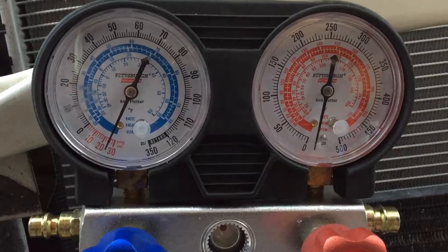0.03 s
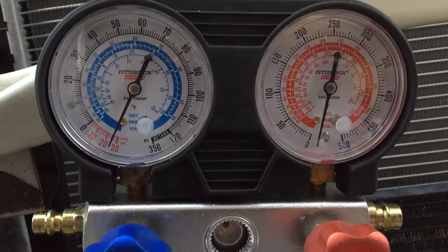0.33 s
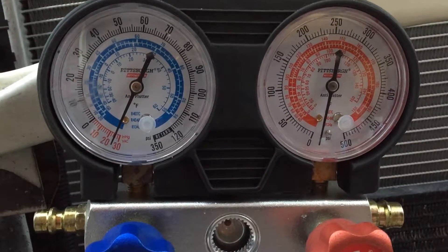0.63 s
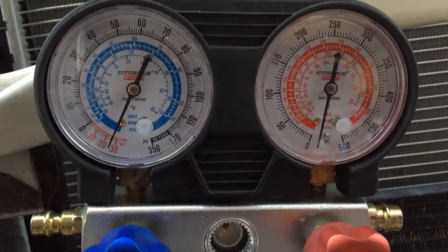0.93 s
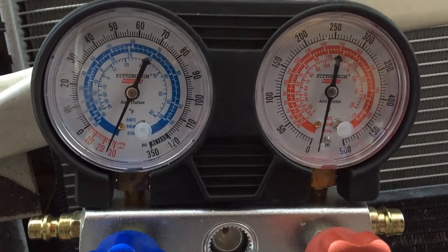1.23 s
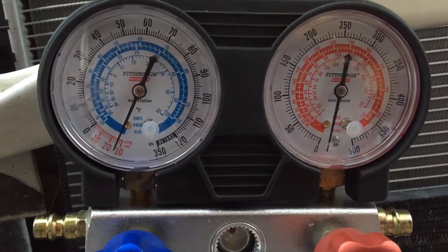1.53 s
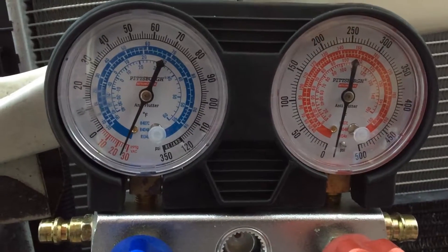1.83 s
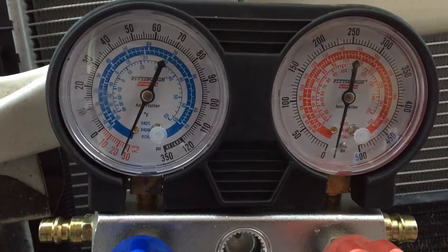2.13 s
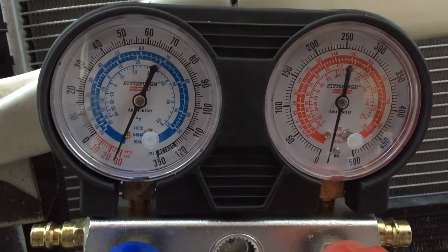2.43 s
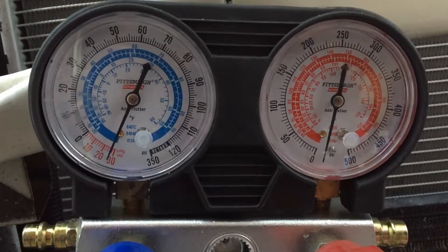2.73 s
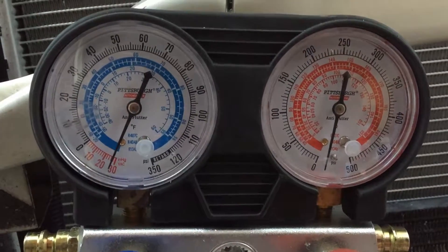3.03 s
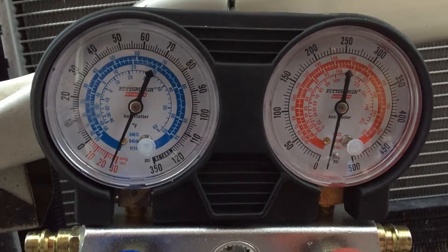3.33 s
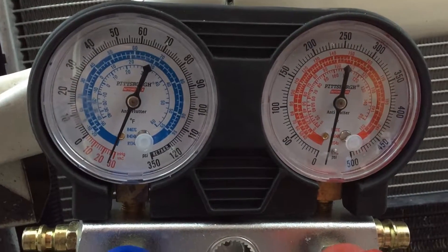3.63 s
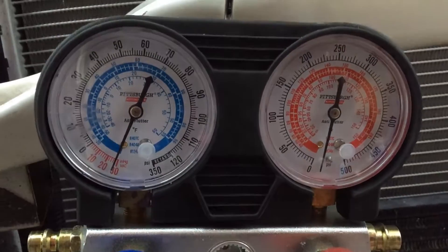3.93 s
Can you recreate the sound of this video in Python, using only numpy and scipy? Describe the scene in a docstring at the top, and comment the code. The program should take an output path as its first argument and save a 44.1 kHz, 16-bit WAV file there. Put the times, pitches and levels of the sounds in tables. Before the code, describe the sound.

A small pump runs steadily close to the microphone, buzzing with a fast metallic rattle and scattered sharper clacks that come more often in the second half. A deep hum throbs beneath it over a soft rush of air.

```python
"""Close beside a small running pump, likely a vacuum pump on a car's air-conditioning gauges.
Its shaft gives a low buzz. A deep hum, probably a fan, throbs against it over a soft rush of air.
On every turn a valve clacks shut and bounces, ringing the metal housing with a bright crack;
some clacks are much harder. Each turn also gives two dull knocks."""
import sys
import numpy as np
from scipy import signal
from scipy.fft import rfft, irfft, next_fast_len
from scipy.io import wavfile
from scipy.ndimage import uniform_filter1d, map_coordinates

SR = 44100
rng = np.random.default_rng(int(sys.argv[2]) if len(sys.argv) > 2 else 0)


def unload_wav(signal):
    """Save mono or channel-first audio to the path in sys.argv[1] as 16-bit WAV at rate SR, clipped to [-1, 1]."""
    wavfile.write(
        sys.argv[1],
        SR,
        np.round(np.clip(np.atleast_2d(signal).T, -1, 1) * 32767).astype(np.int16),
    )


N = 176400
TIME = np.arange(N) / SR
BLOW_TIME = np.arange(SR // 10) / SR  # the 0.1 s that one blow's sound may last
CLACK_TURN = .28  # how far into each turn the valve shuts


def amp(db):
    """Turn decibels into a gain."""
    return 10 ** (np.asarray(db) / 20)


def unit(x):
    """Scale a signal to an average size (rms) of 1."""
    return x / np.sqrt(np.mean(x ** 2) + 1e-20)


def curve(rows):
    """Join (time, value) points with straight lines, one value per sample."""
    return np.interp(TIME, *np.transpose(rows))


def wobble(rate):
    """A smooth random curve through `rate` points a second."""
    return map_coordinates(rng.standard_normal(1024), [TIME * rate + 2], mode="wrap")


def filtered(x, response):
    """Scale each frequency in x by response(frequency)."""
    size = next_fast_len(N + 8192)
    return irfft(rfft(x, size) * response(np.fft.rfftfreq(size, 1 / SR)), size)[:N]


def noise(spectrum):
    """Noise of rms 1, its tone shaped by (f/Hz, level/dB) points."""
    f, db = np.transpose(spectrum)
    white = rng.standard_normal(N)
    return unit(filtered(white, lambda hz: amp(np.interp(np.log(hz + 1), np.log(f), db))))


def strike(attack_s, t60):
    """A quick rise, then a fade of 60 dB every t60 seconds."""
    return (1 - np.exp(-BLOW_TIME / attack_s)) * np.exp(-np.log(1000) * BLOW_TIME / t60)


def struck(times, db, response):
    """Play the response once at each time, at that blow's level."""
    starts = np.maximum(np.round(times * SR).astype(int), 0)
    blows = np.bincount(starts.ravel(), amp(db).ravel(), N)[:N]
    return signal.oaconvolve(blows, response)[:N]


def shaft_buzz(turns):
    """The shaft buzzes with slightly rough tones at whole multiples of its turning rate."""
    # buzz tones: multiple of the turning rate, level/dB, change from start to end/dB
    harmonics = [(1, -45, -0.5), (2, -57, 6), (3, -54, 4), (4, -62, -11.5), (5, -54, -11.5),
                 (6, -60.5, -4.5), (7, -60.5, -4), (10, -66.5, -9.5), (15, -48.5, 5.5), (16, -53.5, 1),
                 (17, -53.5, -3.5)]
    angle = 2 * np.pi * (turns + .0013 * wobble(40))
    progress = np.linspace(-.5, .5, N)
    buzz = np.zeros(N)
    for multiple, db, change_db in harmonics:
        gain = amp(db + change_db * progress + 2.66 * wobble(20))
        buzz += gain * np.cos(multiple * angle + rng.uniform(0, 2 * np.pi))
    return amp(-1) * np.sqrt(2) * buzz


def fan_hum(hum_hz=66.6):
    """A deep, nearly pure hum that swells and fades, with faint wavering whines."""
    # loudness of the hum: t/s, level/dB
    hum_levels = [(0, -36), (.3, -38.5), (.5, -35), (.82, -38.5), (1.05, -50), (1.35, -35), (1.55, -41),
                  (1.75, -36), (2, -39.5), (2.22, -31), (2.38, -36.5), (2.52, -30.5), (2.7, -32),
                  (3, -28.5), (3.25, -31.5), (3.42, -37), (3.55, -34), (3.75, -39), (4, -38)]
    # faint whines: f/Hz, level/dB
    whines = [(240, -65), (717, -60)]
    gain = amp(curve(hum_levels) + wobble(8.9))
    tones = gain * np.sin(2 * np.pi * (hum_hz * TIME + .0088 * wobble(4.7)))
    for hz, db in whines:
        gain = amp(db + 6 * wobble(5.5))
        tones += gain * np.sin(2 * np.pi * (hz * TIME + .35 * wobble(3)))
    return np.sqrt(2) * tones


def air_rush(level_db=-43.5, waver_db=2.6):
    """Air rushes softly and unevenly under the machines."""
    # tone of the rush: f/Hz, relative level/dB
    spectrum = [(20, -15), (40, -22), (65, 3), (90, -0.5), (125, -1.5), (160, -7), (230, -10), (350, -13.5),
                (460, -19.5), (620, -16), (850, -6.5), (1500, -22), (3000, -24.5), (4400, -30),
                (8000, -32.5), (10400, -64), (15800, -40)]
    # slow drift in its loudness: t/s, level change/dB
    drift = [(0, 0), (1.6, -2.5), (2.2, -3), (2.7, -4), (4, -3.5)]
    return amp(level_db + curve(drift) + waver_db * wobble(4.28)) * noise(spectrum)


def valve_clacks(turns, scatter_db=2.1, jitter_s=.0004, hard_boost_db=33):
    """The valve shuts once a turn, sometimes hard; gives each clack's time and strength."""
    # trend of the ordinary clacks: t/s, strength/dB
    usual_strength = [(0, 1.5), (.5, 1.5), (1.2, -1.5), (1.85, 0.5), (2.1, 2), (2.65, -3), (2.85, -1),
                      (3.35, 1.5), (3.55, -2), (4, -1)]
    # hard clacks, each given to the nearest turn: t/s, level before the boost/dB
    hard_clacks = [(0.0217, -25), (0.0916, -21), (0.336, -27), (1.6251, -25), (1.713, -23), (1.7638, -23),
                   (2.0252, -25), (2.0771, -23), (2.1823, -26), (2.2861, -26), (2.375, -27), (2.4777, -24),
                   (2.5471, -25), (2.7566, -24), (2.791, -24), (2.9651, -27), (2.999, -21), (3.053, -25),
                   (3.1586, -26), (3.2091, -24), (3.451, -21), (3.4695, -20), (3.4865, -19), (3.5034, -20),
                   (3.5912, -25), (3.6435, -25), (3.6949, -24), (3.7293, -25), (3.7642, -24), (3.7987, -22),
                   (3.8505, -22), (3.885, -23), (3.903, -22), (3.9543, -20)]
    shut_turns = np.arange(int(turns[-1] - CLACK_TURN) + 1) + CLACK_TURN
    times = np.interp(shut_turns, turns, TIME)
    chance = rng.uniform(-1, 1, (len(times), 2)) * np.sqrt(3)
    db = np.interp(times, *np.transpose(usual_strength)) + scatter_db * chance[:, 0]
    times = times + jitter_s * chance[:, 1]
    hard_s, hard_db = np.transpose(hard_clacks)
    hard = np.argmin(abs(times[:, None] - hard_s), axis=0)
    db[hard - 1] -= 2  # the turn before a hard clack is softer
    db[hard] = hard_db + hard_boost_db
    return times, db


def valve_chatter(times, db, scatter_db=2, hard_loss=.7):
    """The valve bounces twice after each clack; a hard clack seats it more cleanly."""
    # bounces: delay/s, spread of the delay/s, level change/dB
    bounces = [(.0015, .0005, -3.5), (.0045, .0012, 0.5)]
    delay, spread, change_db = np.transpose(bounces)
    chance = rng.standard_normal((2, len(times), len(delay)))
    bounce_times = times[:, None] + abs(delay + spread * chance[0])
    softened_db = db - hard_loss * np.maximum(db, 0)
    bounce_db = softened_db[:, None] + change_db + scatter_db * chance[1]
    return np.column_stack([times, bounce_times]), np.column_stack([db, bounce_db])


def housing_ring(times, db, attack_s=.0014, scatter_db=3.5, wander_db=2, bloom_cycles=8.3):
    """Each clack rings the metal housing with a slightly different mix of its natural tones."""
    # housing tones: f/Hz, level/dB, time for the tail to fade 60 dB/s,
    # change from start to end/dB, share of the clack's strength that the tone follows
    modes = [(1744, -50, 0.075, 0.5, 0.17), (1937, -54.5, 0.17, 3, 0.81), (2347, -31, 0.082, 5.5, 0.99),
             (2393, -41, 0.049, -6, 0.23), (2780, -50, 0.084, -11, 0.4), (3488, -53, 0.075, 2.5, 0.65),
             (3720, -51, 0.005, 19, 0.96), (4028, -42.5, 0.078, -4.5, 0.067), (4068, -54, 0.12, -12, 0.1),
             (4565, -55.5, 0.17, -12, 0.067), (5240, -47, 0.065, 1, 0.66), (5313, -48.5, 0.021, -6, 0.46),
             (5367, -54.5, 0.1, 4, 0.89), (6170, -56.5, 0.11, 2, .5), (6676, -64, 0.12, 4, 0.24),
             (7706, -60, 0.09, 0, 0.16), (8200, -56.5, 0.09, -5.5, 0.1), (9145, -61, 0.068, 4, 0.26),
             (9730, -64, 0.11, 4, 0.17), (13350, -63, .02, -6, 0.31)]
    first_db = db[:, :1]
    progress = times * SR / N - .5
    ring = np.zeros(N)
    for hz, level_db, t60, change_db, follow in modes:
        freedom = np.sqrt(2 * (1.1 - follow))  # tones that follow less vary more by chance
        wander = unit(uniform_filter1d(rng.standard_normal(len(db)), size=7))[:, None]
        chance = rng.uniform(-1, 1, first_db.shape) * np.sqrt(2)
        random_db = freedom * (scatter_db * chance + wander_db * np.tanh(wander))
        blow_db = level_db + db - (1 - follow) * first_db + change_db * progress + random_db
        fade = strike(attack_s, t60=.026) + amp(-7) * strike(attack_s, t60)  # quick drop, weak tail
        bloom = 1 - np.exp(-hz * BLOW_TIME / bloom_cycles)  # the ring spreads through the housing
        ring += struck(times, blow_db, np.sin(2 * np.pi * hz * BLOW_TIME) * fade * bloom)
    return amp(2.5) * ring


def valve_crack(times, db, level_db=-48.5, attack_s=.00011, follow=.95):
    """Each contact of the valve gives a bright crack with a sizzling tail."""
    # tone of the crack: f/Hz, relative level/dB
    spectrum = [(500, -4), (900, 4.5), (1400, 7.5), (1600, -22.5), (2100, -36), (2550, 11.5), (3150, -5),
                (3700, -11.5), (4150, 15.5), (4350, -31), (4650, -29), (4900, -16), (5250, 3.5),
                (5800, -1.5), (6300, -14.5), (7100, -24), (8000, 4), (8700, -11.5), (9650, -7.5),
                (10400, -24.5), (11300, -12.5), (13400, -20.5), (14000, -26), (15800, -28)]
    snap = strike(attack_s, t60=.004)
    tail = amp(9.5) * strike(attack_s, t60=.063)
    contact_db = db - (1 - follow) * db[:, :1]
    power = struck(times, 2 * contact_db, snap ** 2 + tail ** 2)  # overlapping noises add in power
    bursts = unit(np.sqrt(abs(power)))
    return amp(level_db + 2 * wobble(12)) * bursts * noise(spectrum)


def pump_knocks(turns, level_db=-2, scatter_db=4.5, rise_db=6, jitter_s=.00008):
    """Two dull knocks a turn ring the pump's body, regular in time and uneven in strength."""
    # the two knocks: delay after the clack/turns, relative level/dB
    strokes = [(0, -2), (0.258, -11)]
    # body tones: f/Hz, level/dB, time to fade 60 dB/s
    body_modes = [(737, -51, 0.066), (930, -53, 0.036), (990, -42.5, 0.042), (1060, -42, 0.012),
                  (1254, -48, 0.027)]
    delay_turns, stroke_db = np.transpose(strokes)
    knock_turns = np.arange(int(turns[-1]))[:, None] + CLACK_TURN + delay_turns
    times = np.interp(knock_turns, turns, TIME)
    chance = rng.standard_normal((2, *times.shape))
    db = level_db + stroke_db + scatter_db * chance[0] + rise_db * (times * SR / N - .5)
    ring = np.zeros(len(BLOW_TIME))
    for hz, mode_db, t60 in body_modes:
        fade = np.exp(-np.log(1000) * BLOW_TIME / t60)
        ring += amp(mode_db) * np.sin(2 * np.pi * hz * BLOW_TIME) * fade
    low_cut = signal.butter(2, 616, "high", fs=SR, output="sos")  # a small body gives off little bass
    return struck(times + jitter_s * chance[1], db, signal.sosfilt(low_cut, ring))


def scene():
    """The pump's shaft times its buzz, clacks and knocks; fan and air run on their own."""
    # shaft speed: t/s, turning rate/Hz
    shaft_speed = [(0, 57.28), (1.1, 57.46), (2.9, 57.49), (4, 57.62)]
    turns = np.cumsum(curve(shaft_speed)) / SR
    times, db = valve_chatter(*valve_clacks(turns))
    valve = housing_ring(times, db) + valve_crack(times, db)
    pump = valve + pump_knocks(turns) + shaft_buzz(turns)
    return (pump + fan_hum() + air_rush())[None]


def record(dry):
    """The microphone picks up nothing above its highest frequency."""
    top_hz = 15850
    return filtered(dry[0], lambda hz: hz < top_hz)[None]


dry = scene()
out = record(dry)
unload_wav(out)
```